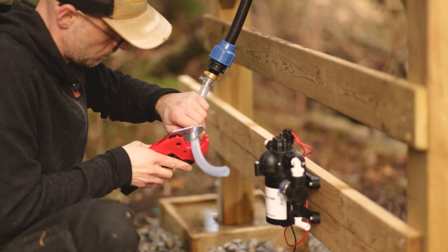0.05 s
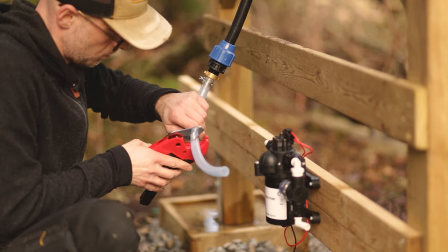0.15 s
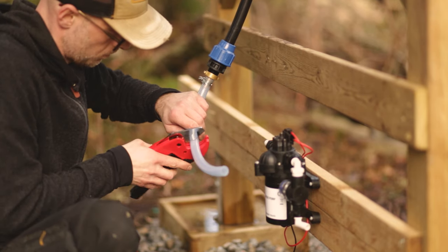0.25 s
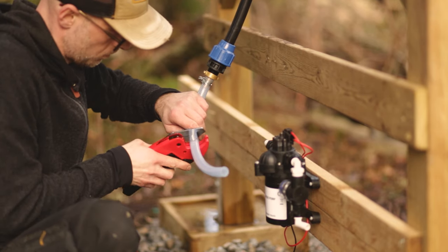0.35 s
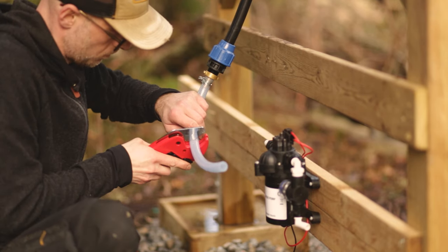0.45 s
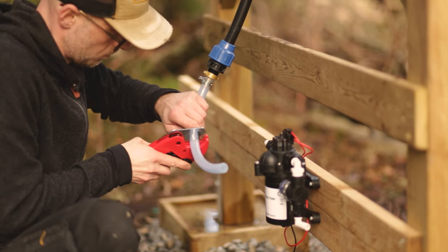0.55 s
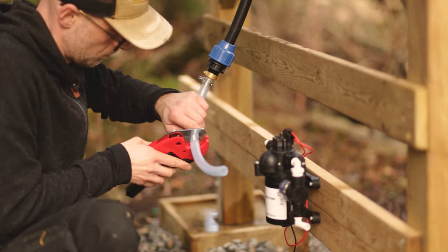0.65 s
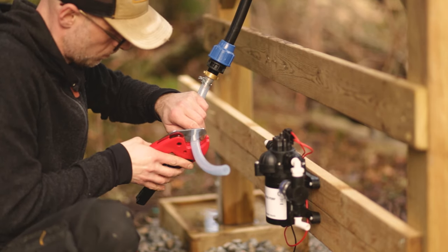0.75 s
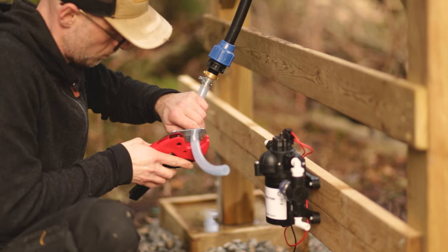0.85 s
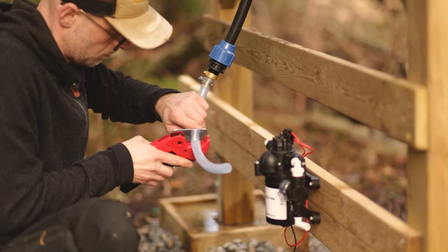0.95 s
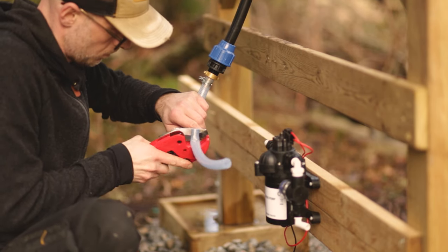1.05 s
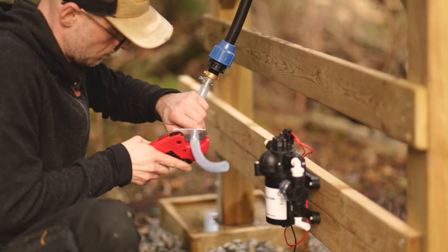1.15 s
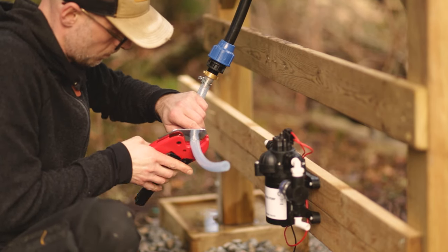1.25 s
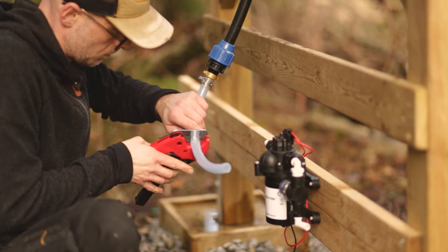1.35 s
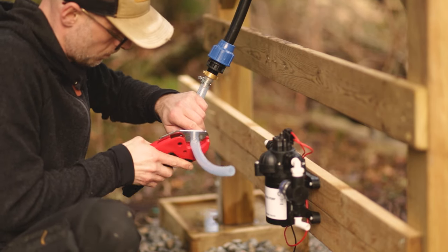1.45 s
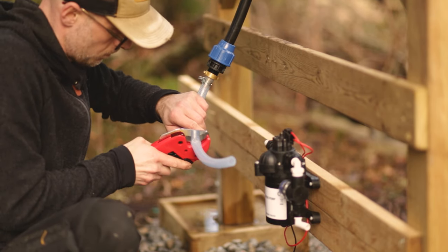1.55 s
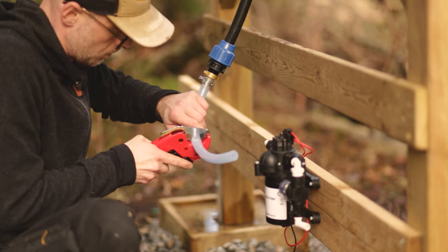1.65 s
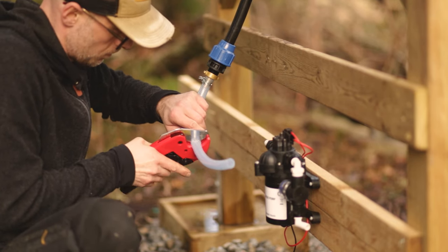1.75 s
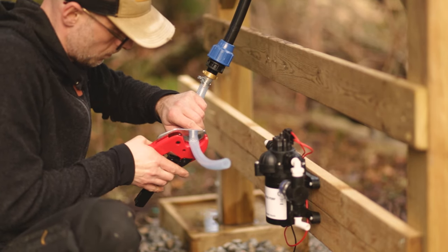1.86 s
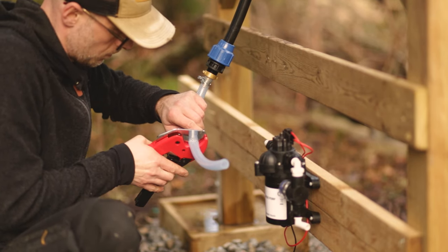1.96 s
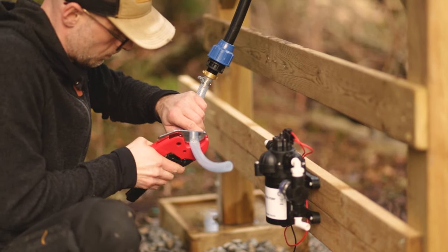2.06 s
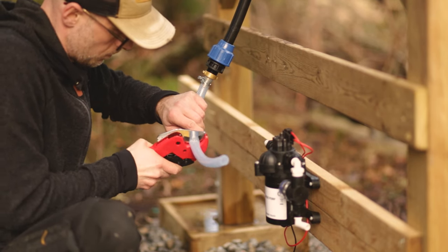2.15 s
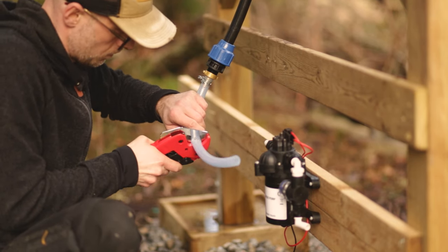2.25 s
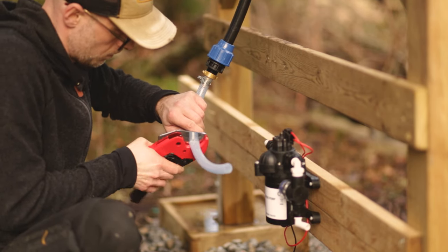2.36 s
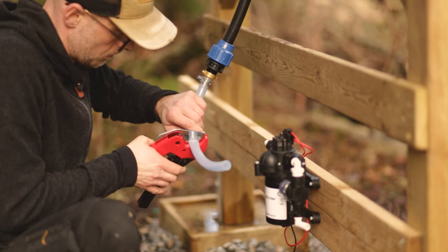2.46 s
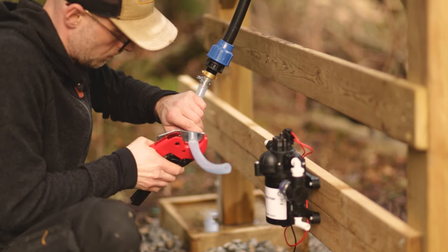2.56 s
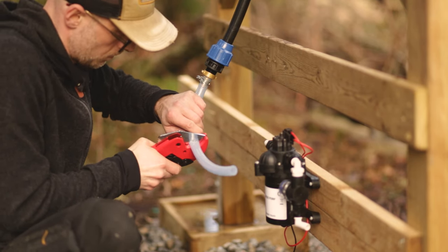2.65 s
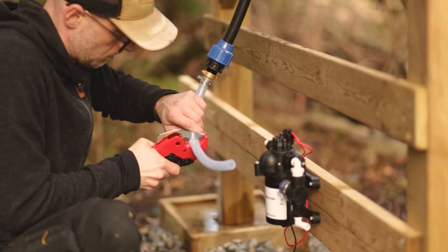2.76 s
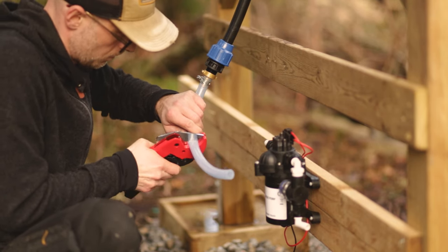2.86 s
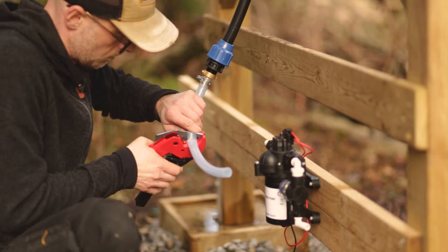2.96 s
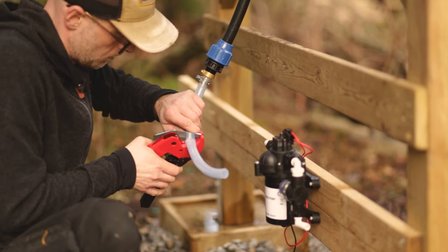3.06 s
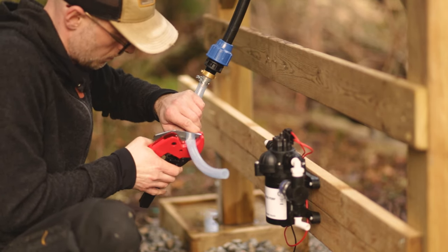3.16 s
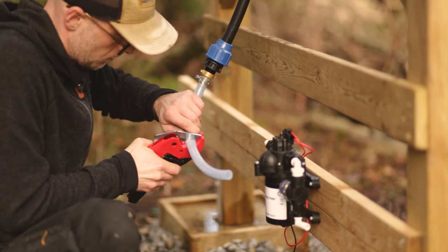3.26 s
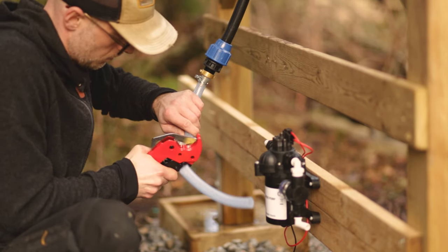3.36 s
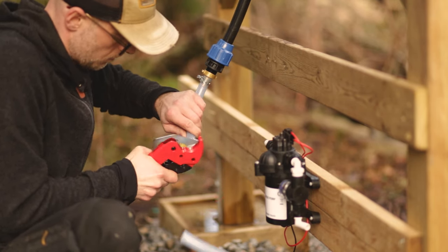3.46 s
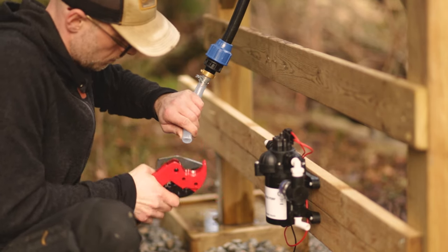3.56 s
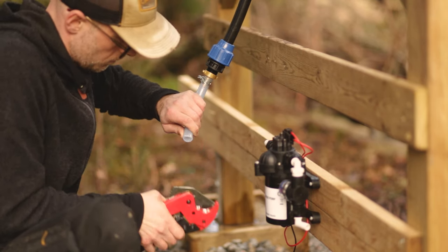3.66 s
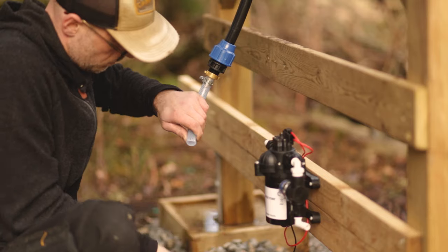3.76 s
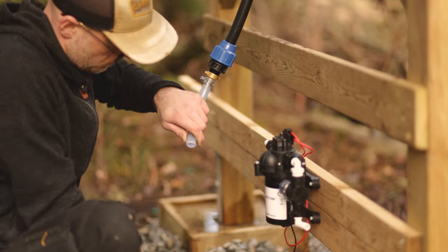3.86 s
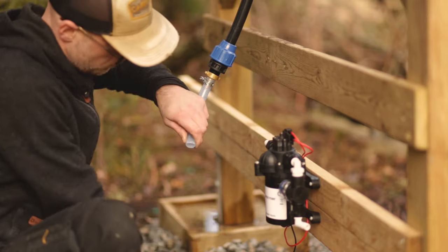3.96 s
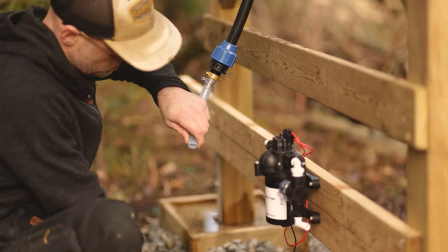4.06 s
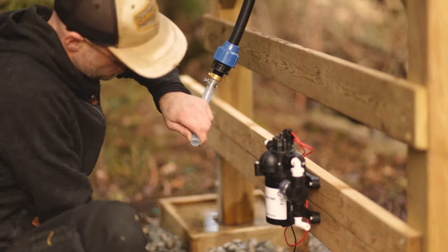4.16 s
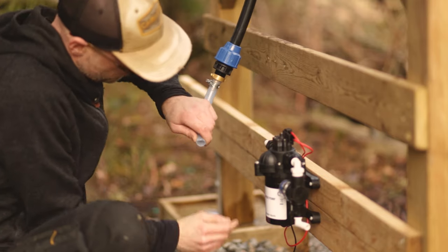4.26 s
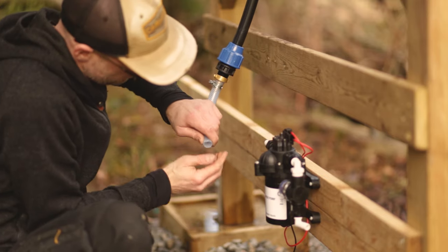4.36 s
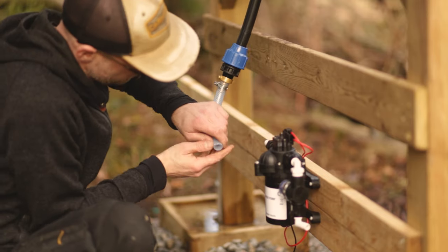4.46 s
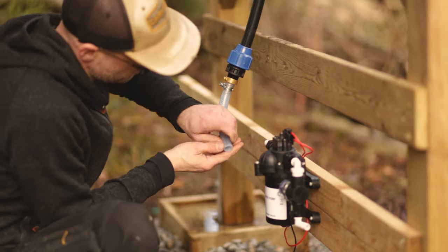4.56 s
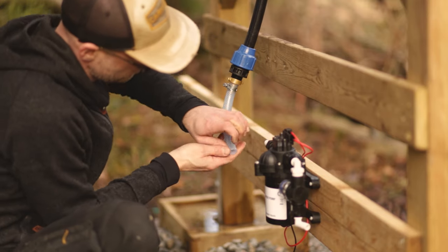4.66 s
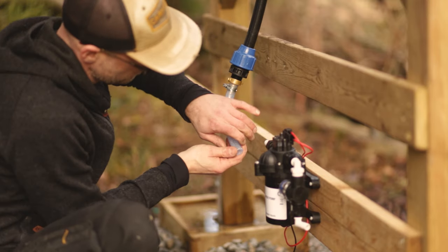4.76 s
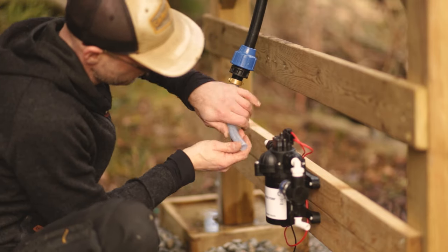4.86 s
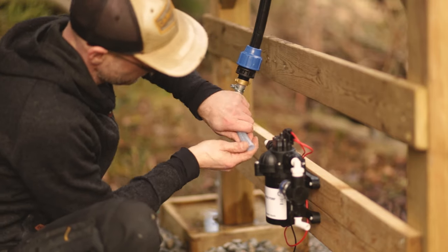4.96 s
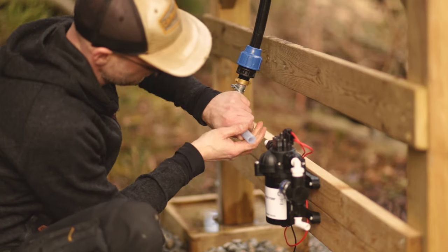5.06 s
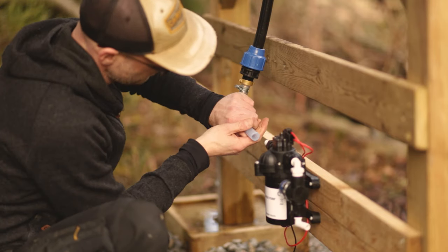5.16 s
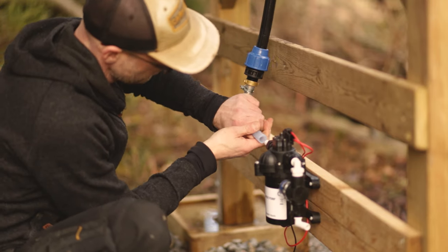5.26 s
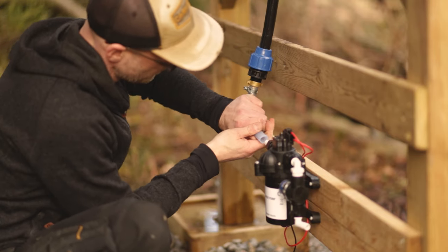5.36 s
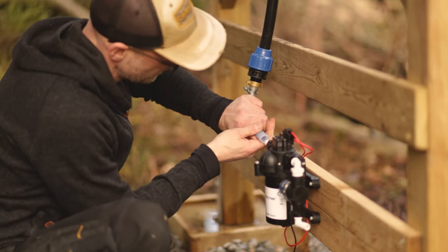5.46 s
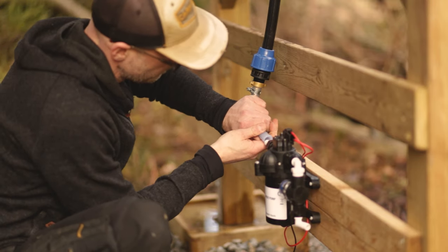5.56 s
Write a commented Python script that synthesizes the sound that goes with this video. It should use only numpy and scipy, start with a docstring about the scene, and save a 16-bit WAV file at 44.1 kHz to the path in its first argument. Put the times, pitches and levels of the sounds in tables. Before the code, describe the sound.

A ratcheting cutter works through plastic tubing close to the microphone, a little to the left, in a quiet wooded yard. It opens with a short scrape, then sharp, dry metal clicks run until about 3 seconds, the stronger ones roughly every 0.6 seconds with weaker ones between. The blade creaks faintly in the plastic and gives two short rising squeaks, near 2.1 and 2.7 seconds. At about 3.35 seconds the tube parts with a snap, by far the loudest sound, with a few quick, low, hollow pops. The offcut lands with a light double tap near 3.7 seconds. From 4.1 to 4.4 seconds the tool is laid down with small knocks and a brief, high ring of the blade. Hands and sleeves rustle faintly. The clicks echo slightly off a fence and trees, and a soft, low rumble of air continues to the end, around 5.5 seconds.

```python
"""A short scrape, then sharp pawl clicks: a ratcheting cutter bites through plastic tubing.
It is close to the microphone, a little to the left, in a quiet wooded yard. The blade sticks and slips
in the plastic, squeaking and creaking, until the tube parts with a loud snap and hollow pops.
The offcut drops, the tool is laid down and its blade rings. A fence and the trees throw the clicks
back over a low rumble of moving air."""
import sys
import numpy as np
from scipy import signal
from scipy.fft import rfft, irfft
from scipy.io import wavfile
from scipy.ndimage import uniform_filter1d

SR = 44100
rng = np.random.default_rng(int(sys.argv[2]) if len(sys.argv) > 2 else 0)


def master(y):
    """Save y as 16-bit WAV."""
    cut = np.clip(np.atleast_2d(y).T, -1, 1)
    pcm = np.round(cut * 32767)  # scale
    wavfile.write(sys.argv[1], SR, pcm.astype(np.int16))


N = 247842

FREQS = np.fft.rfftfreq(2048, 1 / SR)
# spectrum of steel slipping in plastic: frequency_hz, level_db
SLIP_COLOUR = [(300, -19.5), (1200, -20.5), (2000, -7.5), (3200, -1.5), (5000, 1), (8000, 1.5),
               (12000, -2.5), (14500, -8), (16000, -13.5)]


def ratchet(beam_width_hz=420, beam_db=8):
    """Pawl and blade clicks, direct and outward; in each, one resonance beams at the microphone."""
    # steel impacts: start_s, level_db, length_s, low_db, high_db, resonance_hz
    clicks = [(0.001, -37, 0.01, 4.5, -5, 1900), (0.1234, -50.5, 0.0032, 0, -12, 4770),
              (0.1812, -26.5, 0.005, -5, -4, 3330), (0.19, -36, 0.0023, -8, -14, 4460),
              (0.473, -37, 0.001, -9.5, -3, 8950), (0.7471, -25, .003, -4.5, -5, 7550),
              (1.042, -36, 0.0032, -14.5, -5, 5030), (1.304, -25.5, 0.002, -6, -7, 8000),
              (1.4627, -46, 0.0097, 4.5, -7, 4900), (1.5992, -33, .0035, -8.5, -2, 5050),
              (1.766, -53, .0024, -3, -39, 4750), (1.8661, -25.5, 0.0013, -10, -5, 10300),
              (2.06, -44, 0.0037, -1, -11, 4400), (2.1827, -29.5, .002, -12.5, -3.5, 11800),
              (2.4155, -23.5, 0.0031, -8.5, -3.5, 12500), (2.588, -48.5, 0.0027, -1.5, -21, 4750),
              (2.7235, -34, .003, -8, -8, 11900), (3.0225, -27, 0.0029, -10.5, -4.5, 7630),
              (3.3481, -9.5, 0.0039, .5, -7.5, 7620)]
    direct, outward = np.zeros(N), np.zeros(N)
    hardest_db = max(row[1] for row in clicks)
    for start, db, length, low_db, high_db, hz in clicks:
        thump_db = low_db + .5 * (db - hardest_db)  # only hard blows jolt the whole tool
        colour = curve([(60, thump_db - 15), (130, thump_db - 14), (350, thump_db - 2),
                        (600, low_db - 16.5), (1250, low_db - 11.5), (1750, low_db - 5),
                        (3000, low_db + 1.5), (5000, -3.8), (8000, 0), (11000, high_db + 2),
                        (14500, high_db - 3), (16000, high_db - 11)], FREQS)
        beam = beam_db / (1 + ((FREQS - hz) / beam_width_hz) ** 2)
        add(direct, start, amp(db + 1) * chatter(length, colour + beam))
        all_round = unit(impulse(colour + .2 * beam)) * np.sqrt(SR / 100)
        add(outward, start + length / 2, amp(db - 1) * all_round)
    return direct, outward + .62 * direct


def chatter(length, colour_db, rise=0.00046, t60=0.013):
    """Two hard parts chatter for a few ms, with the energy of 10 ms at an rms of one."""
    t = seconds(.02)
    burst = rng.standard_normal(len(t)) * np.minimum(t / rise, 1) * fade(np.maximum(t - length, 0), t60)
    spectrum = rfft(burst, 2 * (len(FREQS) - 1))
    # the contacts excite all bands alike
    spectrum /= np.sqrt(abs(uniform_filter1d(abs(spectrum) ** 2, size=70)) + 1e-12)
    return unit(signal.fftconvolve(irfft(spectrum), impulse(colour_db))) * np.sqrt(SR / 100)


def blade_push(start, attack, hold, release, level_db, top_hz, octaves, glide, rough):
    """Times, slip rate, level and roughness of one push; the slips slow as the hand eases."""
    swell_db, die_db, slowing_oct_per_s, creak_hz = 27.5, 30, 62, 260
    t = seconds(attack + hold + release)
    eased = np.maximum(t - attack - hold, 0)
    octaves_down = octaves * np.maximum(1 - t / glide, 0) + slowing_oct_per_s * eased
    rate_hz = np.maximum(top_hz / 2 ** octaves_down, creak_hz)
    db = level_db - swell_db * np.maximum(1 - t / attack, 0) - die_db * eased / release
    return start + t, rate_hz, db, rough + .05 * (t < glide) + .14 * (eased > 0)


def blade_friction(jitter=.55, uneven_db=10):
    """Stick and slip, one pulse a slip: slow slips creak, fast ones merge into a squeak."""
    # pushes through the plastic:
    # start_s, attack_s, hold_s, release_s, level_db, top_rate_hz, glide_octaves, glide_s, roughness
    pushes = [(0, 0.00065, .003, 0.068, -40, 990, 0, .01, 0.46),
              (0.17, 0.0025, 0.0055, .003, -54, 4500, 1, .01, 0.5),
              (1.587, 0.0011, 0.00063, 0.061, -50, 12400, 0.28, .01, .02),
              (1.608, .002, 0.017, .16, -57.5, 260, 0, .01, 0.23),
              (2.122, .044, .004, .03, -30, 8300, 1.2, .026, .09),
              (2.173, .002, 0.0066, .01, -42.5, 7700, 0.7, .01, 0.2),
              (2.189, 0.0024, 0.045, 0.012, -47.5, 320, 0, .01, 0.08),
              (2.622, .048, .035, .07, -35.5, 3750, 1.6, .098, .1),
              (2.842, .003, 0.01, .1, -48.5, 730, 0, .01, 0.3),
              (3.342, 0.0037, .002, 0.0025, -23.5, 4500, 0, .006, 0.68)]
    out, taps = np.zeros(N), np.arange(-8, 9)
    for push in pushes:
        t, rate_hz, db, rough = blade_push(*push)
        slip_count = np.cumsum(rate_hz) / SR
        slip_s = np.interp(np.arange(slip_count[-1]), slip_count, t)
        rate_hz, db, rough = (np.interp(slip_s, t, track) for track in (rate_hz, db, rough))
        offset, strength, drift = rng.standard_normal((len(slip_s), 3)).T
        place = (slip_s + jitter * rough * (offset + np.cumsum(drift) / 2) / rate_hz) * SR
        size = amp(db + uneven_db * np.minimum(rough, .5) * strength / 2) * np.sqrt(SR / rate_hz)
        # windowed sinc pulses can fall between samples
        index = np.round(place).astype(int)[:, None] + taps
        pulses = size[:, None] * np.sinc(index - place[:, None]) * np.hanning(len(taps))
        out += np.bincount(np.clip(index, 0, N - 1).ravel(), (pulses * (index >= 0)).ravel(), N)
    return signal.oaconvolve(out, unit(impulse(curve(SLIP_COLOUR, FREQS))))[:N]


def blade_jerks():
    """Brief, bright ticks as the blade starts and stalls in the plastic."""
    # single slips: start_s, level_db
    jerks = [(1.796, -57), (2.2446, -49), (2.257, -55), (2.277, -51.5), (2.2913, -55.5), (2.6258, -52),
             (2.8344, -51.5)]
    out = np.zeros(N)
    for start, db in jerks:
        add(out, start, amp(db) * chatter(.0008, curve(SLIP_COLOUR, FREQS), rise=.0002, t60=.012))
    return out


def cutter_body(x, ring_db=-12, t60=0.079, floor_db=-7, left_db=.8):
    """Damped by the hand, the tool's crowded modes ring briefly, unevenly to left and right."""
    # resonances of steel and shell: pitch_hz, width_hz, level_db
    modes = [(1639, 90, 10.5), (1950, 200, 6.5), (2291, 79, 3), (2760, 71, 3.5), (3170, 220, 6),
             (3852, 160, 5), (4194, 90, 2.5), (5400, 73, -0.5), (5750, 93, -4.5), (6970, 200, -2.5),
             (8250, 41, 0.5), (8616, 140, -1.5), (10400, 250, -2), (12300, 900, -4.5)]
    peaks = sum(amp(db) ** 2 / (1 + (2 * (FREQS - hz) / width) ** 2) for hz, width, db in modes)
    colour_db = 10 * np.log10(amp(floor_db) ** 2 + peaks)
    t = seconds(1)
    noise = irfft(stereo_spectra([(1000, .54), (8000, .85), (15000, .4)], SR))
    tail = noise * fade(t, t60) * np.minimum(t / .0056, 1)
    response = np.sqrt(2) * unit(signal.fftconvolve(tail, impulse(colour_db)[None], axes=1))
    ringing = amp(ring_db) * signal.fftconvolve(x[None], response, axes=1)[:, :N]
    return ringing * amp([[left_db], [-left_db]])


def tube_wall(x, rattle_db=-3, t60=0.017):
    """Each slip rattles on for a few ms in the wall of the tube."""
    t = seconds(.03)
    response = amp(rattle_db) * unit(rng.standard_normal(len(t)) * fade(t, t60))
    response[0] += 1
    return signal.oaconvolve(x, unit(response))[:N]


def tube_pops(rise_s=0.0038):
    """The tube pops at its low hollow note as the cut ends spring free."""
    # modes of the hollow tube: pitch_hz, level_db, t60_s
    modes = [(299.7, 0.5, 0.15), (325, -2.5, 0.089), (373, -2, .041), (174.2, -15, .18)]
    # ends springing free: start_s, level_db
    pops = [(3.351, -35.5), (3.407, -31.5), (3.429, -35)]
    out = np.zeros(N)
    for start, db in pops:
        add(out, start, amp(db) * ring(modes) * np.minimum(seconds(.5) / rise_s, 1))
    return out


def ground_knocks():
    """Offcut and tool land with dull, broad knocks; the blade rings as it touches down."""
    # impacts on the ground: start_s, level_db, length_s, low_db, high_db
    knocks = [(3.6686, -41, 0.0033, 2, -4), (3.683, -38, 0.0033, 3, -4.5), (4.123, -48, 0.0073, -6, -35),
              (4.141, -53.5, .004, 2.5, -24.5), (4.18, -55, .0026, 13, -12), (4.1913, -45, 0.0036, 9, -2),
              (4.196, -43, 0.0043, 13, 4), (4.215, -47, 0.0013, -26, -9), (4.2201, -42.5, 0.0012, -16, -5),
              (4.2953, -45.5, .003, -3, 10), (4.319, -53, .0025, -11, 2), (4.339, -53.5, 0.0043, 3, -8)]
    # modes of the free blade: pitch_hz, level_db, t60_s
    blade_modes = [(6947, 0, 0.19), (9680, -19, 0.072)]
    # blade touching down: start_s, level_db
    touches = [(4.297, -42), (4.32, -36)]
    out = np.zeros(N)
    for start, db, length, low_db, high_db in knocks:
        colour = curve([(50, low_db - 1), (110, low_db - 6), (240, low_db - 2), (900, low_db + 1),
                        (2200, .43), (4000, .73), (8000, -1.1),
                        (12000, high_db), (16000, high_db - 10)], FREQS)
        add(out, start, amp(db + 2) * chatter(length, colour, t60=.0169))
    for start, db in touches:
        add(out, start, amp(db) * ring(blade_modes))
    return out


def rustle(grains_per_s=2500, spread_db=1.5, floor_db=-76.5):
    """A click's grainy tail fades; then skin and cloth catch and let go in tiny grains."""
    # the fading tail of a click at the start, then hands, sleeves and tool rubbing:
    # peak_s, level_db, time_constant_s
    swells = [(0, -48, 0.069), (.68, -63, 0.0089), (.91, -57, 0.0098), (1.225, -58, 0.013),
              (1.79, -63, 0.012), (2.37, -61, 0.022), (2.6, -67, .1), (3.24, -63, 0.019), (3.8, -66, .02),
              (4.125, -45, 0.0046), (4.214, -51, 0.013), (4.29, -56, 0.03), (4.5, -68.5, .1)]
    # spectrum of the grains: frequency_hz, level_db
    colour = [(200, -8), (1500, 1), (4500, 0.5), (8000, -5), (15000, -15)]
    grains = rng.standard_normal(N) * amp(spread_db * np.minimum(rng.exponential(1, N), 3))
    grains *= rng.random(N) < grains_per_s / SR
    t = np.arange(N) / SR
    level = amp(floor_db) + sum(amp(db) * np.exp(-abs(t - peak) / tau) for peak, db, tau in swells)
    return unit(signal.oaconvolve(grains, impulse(curve(colour, FREQS)))[:N]) * np.sqrt(N) * level


def yard(direct, outward, left_db, near_db=-12, wall_db=-25, trees_db=-22, wall_s=.0495, lead_s=1.3e-5):
    """Direct sound from a little left, scatter off fence and ground, a wall echo and the far trees."""
    # late echo of the trees: frequency_hz, level_db, t60_s
    trees = [(205.1, -2.5, 0.41), (970.5, 1, 0.88), (2220, -1.5, 0.74), (4500, -4.5, 1.), (8300, -6.5, .7),
             (12220, 4.5, 0.22), (16280, 5, 0.59)]
    trees = np.array(trees)
    t = seconds(1)
    coherence = [(300, .63), (3000, .93), (8000, .53), (10000, .18), (15000, .35)]
    near, wall, far = (irfft(stereo_spectra(coherence, SR)) for _ in range(3))
    near = near * fade(t, t60=.13) * np.clip((t - .002) / .0053, 0, 1)
    wall = wall * (t > wall_s) * fade(abs(t - wall_s), t60=.016)
    hz, frame_s, bands = signal.stft(far, SR, nperseg=256)
    band_db, band_t60 = curve(trees[:, :2], hz), curve(trees[:, ::2], hz)
    bands = bands * amp(band_db)[:, None] * fade(frame_s, band_t60[:, None])
    far = signal.istft(bands, SR, nperseg=256)[1][:, :SR] * np.minimum(t / .042, 1)
    echoes = amp(near_db) * unit(near) + amp(wall_db) * unit(wall) + amp(trees_db) * unit(far)
    left, right = direct + signal.fftconvolve(outward[None], np.sqrt(2) * echoes, axes=1)[:, :N]
    delay = np.exp(-2j * np.pi * np.fft.rfftfreq(N, 1 / SR) * lead_s)
    right = irfft(rfft(right) * delay, N)
    return np.array([left * amp(left_db), right * amp(-left_db)])


def open_air(start_db=-50, swell_db_per_s=0.5829):
    """A low rumble of moving air and a soft, distant wash, slowly swelling together."""
    # spectrum of the air: frequency_hz, level_db
    colour = [(12, -8.5), (20, 4.5), (30, -14.5), (81, -22), (146, -26), (187, -24.5), (241, -27.5),
              (270, -24), (558, -24), (607, -23.5), (780, -23.5), (1120, -25.5), (2670, -37.5),
              (4180, -45.5), (16000, -56.5)]
    # likeness of left and right: frequency_hz, coherence
    coherence = [(60, 0.2), (150, 0.52), (380, 0.59), (950, 0.66), (2380, 0.49), (5980, -0.054),
                 (15000, 0.023)]
    # lean to one side: frequency_hz, left_minus_right_db
    balance = [(60, 2.4), (180, 0.5), (550, -0.6), (1650, -1.7), (4970, -0.85), (15000, -0.51)]
    hz = np.fft.rfftfreq(N, 1 / SR)
    side_db = np.outer([1, -1], curve(balance, hz)) / 2
    wash = irfft(stereo_spectra(coherence, N) * amp(curve(colour, hz) + side_db), N)
    return unit(wash) * np.sqrt(2 * N) * amp(start_db + swell_db_per_s * np.arange(N) / SR)


def amp(db):
    """Decibels to gain."""
    return 10 ** (np.asarray(db) / 20)


def unit(x):
    """Scales to an energy of one."""
    return x / np.sqrt(np.sum(x ** 2) + 1e-20)


def curve(points, hz):
    """Joins (frequency_hz, value) points on a log axis."""
    point_hz, value = np.transpose(points)
    return np.interp(np.log(hz + 1), np.log(point_hz + 1), value)


def seconds(length):
    """A time axis."""
    return np.arange(int(length * SR)) / SR


def fade(t, t60):
    """Exponential decay, 60 dB in t60."""
    return np.exp(-np.log(1000) * t / t60)


def add(mix, start_s, sound):
    """Mixes a sound in at start_s."""
    part = mix[max(round(start_s * SR), 0):][:len(sound)]
    part += sound[:len(part)]


def impulse(db):
    """Minimum-phase impulse response of a dB curve over FREQS."""
    log_gain = np.log(amp(np.r_[db, db[-2:0:-1]]))
    return irfft(np.exp(np.conj(signal.hilbert(log_gain)))[:len(FREQS)])


def ring(modes):
    """Decaying partials of a struck object."""
    t = seconds(.5)
    return sum(amp(db) * fade(t, t60) * np.sin(2 * np.pi * hz * t) for hz, db, t60 in modes)


def stereo_spectra(coherence, samples):
    """Left and right spectra of white noise, alike by (frequency_hz, coherence) points."""
    left, other = rfft(rng.standard_normal((2, samples)))
    alike = np.clip(curve(coherence, np.fft.rfftfreq(samples, 1 / SR)), -1, 1)
    return np.array([left, alike * left + np.sqrt(1 - alike ** 2) * other])


def scene():
    """Tool, tube and hands close to the microphone, the yard behind them."""
    clicks, clicks_outward = ratchet()
    cutting = tube_wall(blade_friction()) + blade_jerks()
    handling = ground_knocks() + rustle()
    pops = tube_pops()
    ringing = cutter_body(clicks_outward + cutting)
    tool = yard(clicks + cutting + handling, clicks_outward + cutting + handling, left_db=1.5)
    return tool + ringing + yard(pops, pops, left_db=4) + open_air()


def record(dry, ceiling=.85, cutoff_hz=15900):
    """The loudest peaks are rounded off, then the highest treble is cut."""
    rounded = dry / (1 + (dry / ceiling) ** 4) ** (1 / 4)
    lowpass = signal.firwin(255, cutoff_hz, window=("kaiser", 9), fs=SR)
    return signal.oaconvolve(rounded, lowpass[None], "same")


dry = scene()
out = record(dry)
master(out)
```